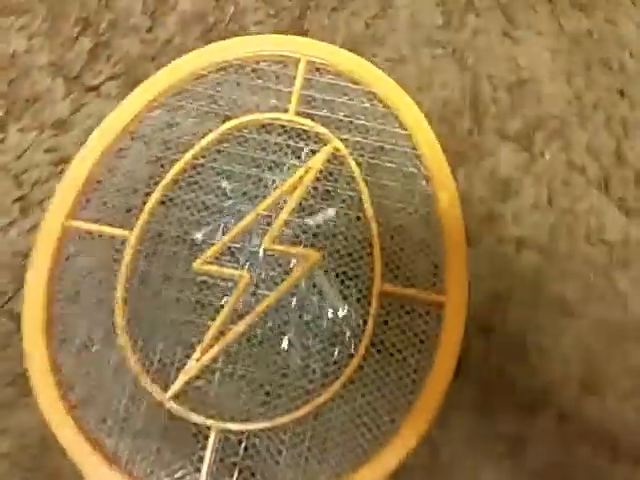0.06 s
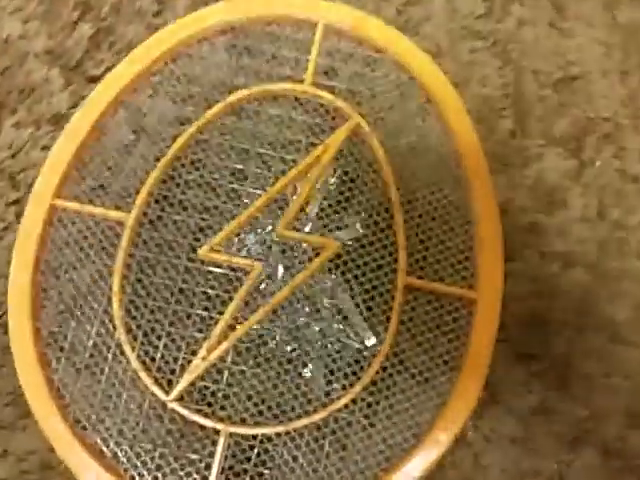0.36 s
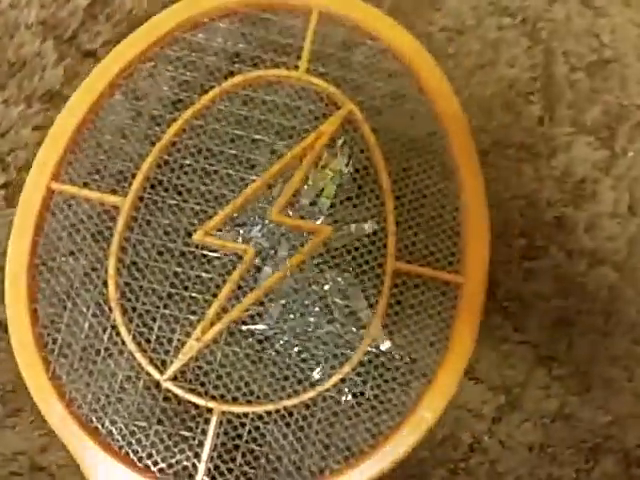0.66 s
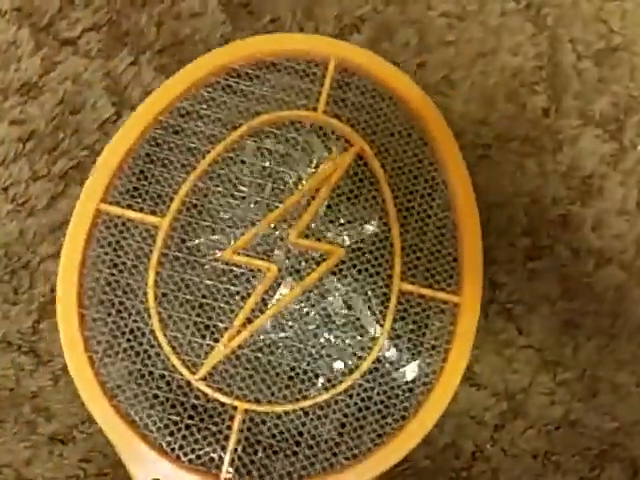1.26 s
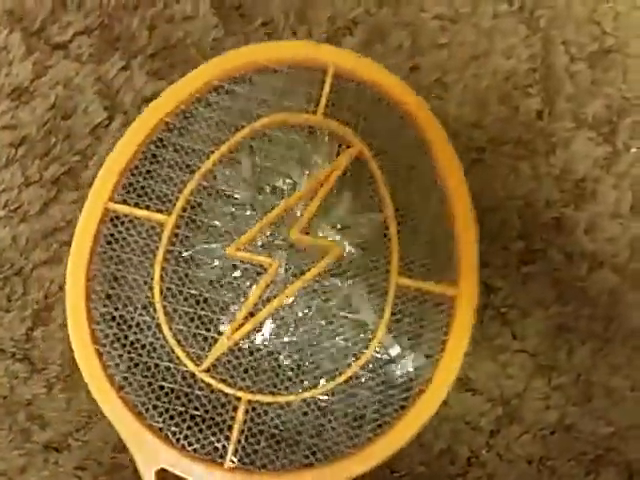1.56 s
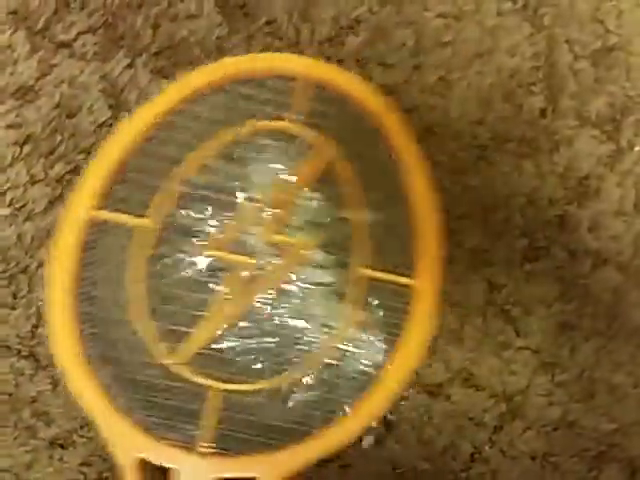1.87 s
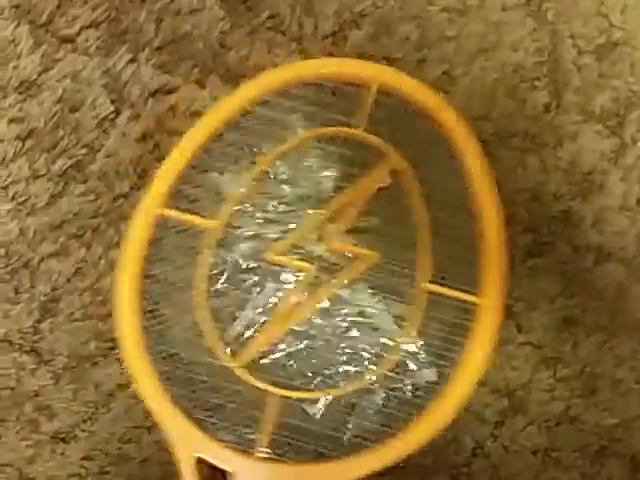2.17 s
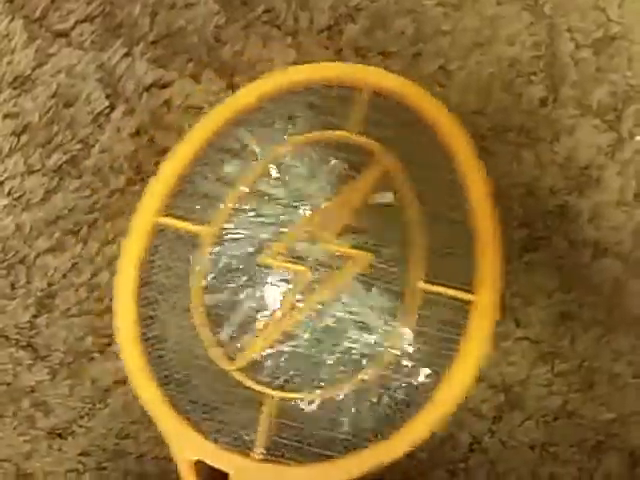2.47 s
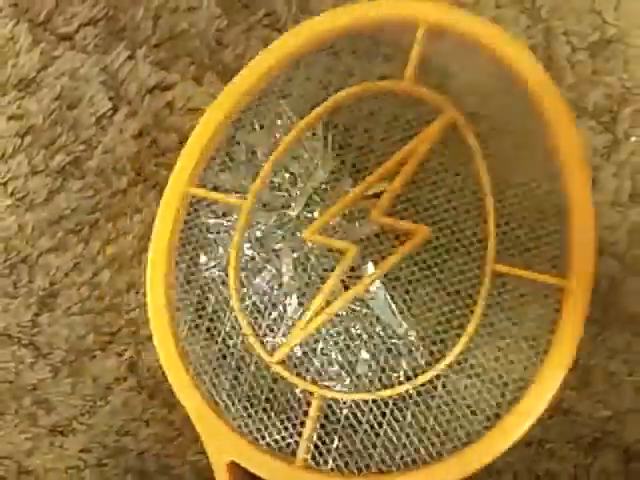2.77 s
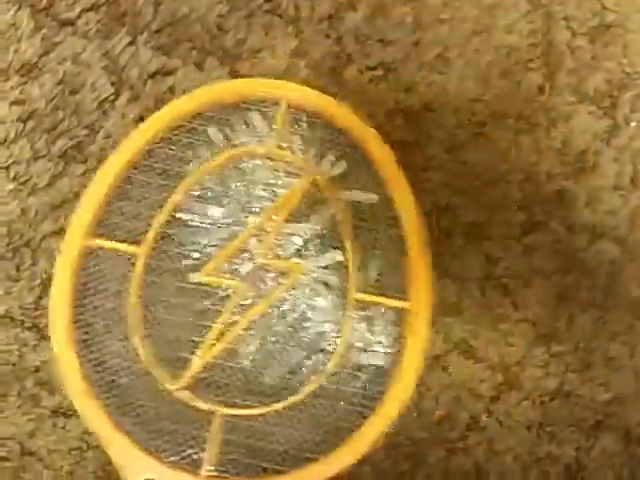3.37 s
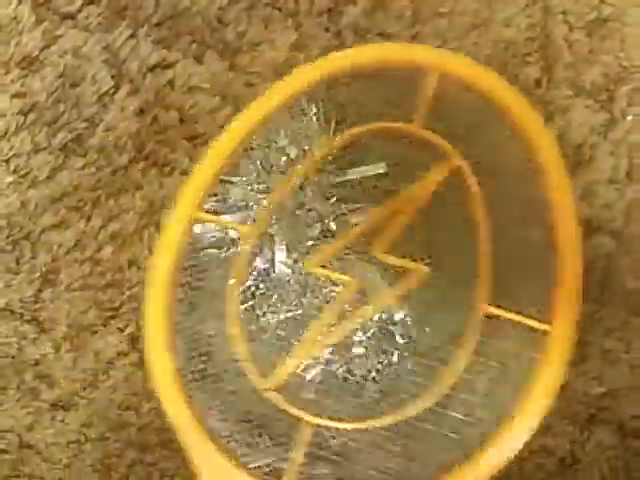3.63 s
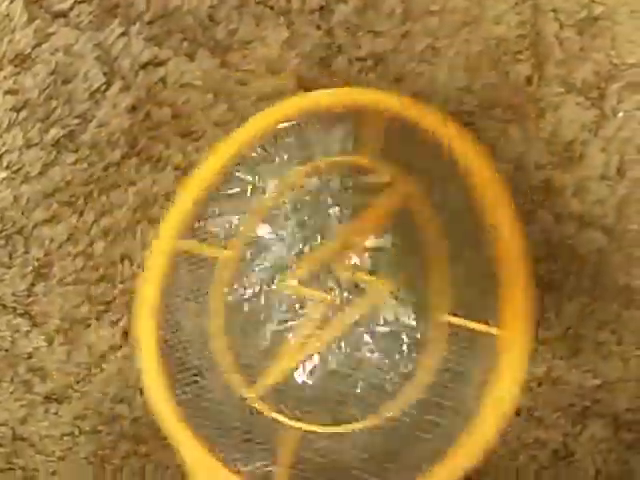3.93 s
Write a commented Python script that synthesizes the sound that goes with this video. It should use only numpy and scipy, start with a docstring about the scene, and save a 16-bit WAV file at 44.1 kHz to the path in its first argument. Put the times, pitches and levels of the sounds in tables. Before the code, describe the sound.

Crisp foil strands rustle and tick against an electric swatter's mesh before a spark cracks.

```python
"""Tinsel rustles in the mesh of an electric swatter racket, shaken close to the microphone in a small room.
Thousands of tiny touches between foil and wire make the rustle, and single strands flick out sharp ticks.
Underneath, the tuft rubs on the mesh, a loose part knocks in the handle, and the hands bump and rumble.
At the end the charged mesh sparks through the foil with one sharp snap."""
import sys
import numpy as np
from scipy import signal
from scipy.fft import rfft, irfft
from scipy.io import wavfile

SR = 44100
rng = np.random.default_rng(int(sys.argv[2]) if len(sys.argv) > 2 else 0)


def int16_out(signal):
    """Quantize to a 16-bit WAV file."""
    q = np.round(np.clip(np.atleast_2d(signal).T, -1, 1) * 32767)
    wavfile.write(sys.argv[1], SR, q.astype(np.int16))


N = 176400  # 4 seconds
TIME = np.arange(N) / SR
TICK_FADE_S = 0.0025  # every fade time here is the time to fall by 60 dB

def from_db(db):
    """Turn decibels into a number to multiply by."""
    return 10 ** (np.asarray(db) / 20)

def unit_power(x):
    """Scale a signal so that its average power is 1."""
    return x / np.sqrt(np.mean(x ** 2) + 1e-20)

def curve(rows):
    """Join (seconds, value) points with straight lines."""
    return np.interp(TIME, *np.transpose(rows))

def pan(db):
    """Left and right gains; positive dB leans left."""
    return from_db(np.array([[db], [-db]]) / 2)

def noise():
    """Separate white noise for left and right."""
    return rng.standard_normal((2, N))

def keep_band(x, hz, kind, order=2):
    """Keep the "low" or the "high" side of a frequency."""
    return signal.sosfilt(signal.butter(order, hz, kind, fs=SR, output="sos"), x + 1e-18)

def colour(x, table, size=8192):
    """Give each side the tone in a table; white noise keeps its overall power."""
    hz, *sides = np.transpose(table)
    log_hz = np.log(np.maximum(np.arange(size // 2 + 1) * SR / size, 1))
    gains = from_db([np.interp(log_hz, np.log(hz), db) for db in sides])
    # fold the filter so that it never sounds before its input
    cepstrum = irfft(np.log(gains))
    cepstrum[:, 1:size // 2] *= 2
    cepstrum[:, size // 2 + 1:] = 0
    response = unit_power(irfft(np.exp(rfft(cepstrum)))) / np.sqrt(size)
    return signal.fftconvolve(x, response, axes=1)[:, :N]

def drift(hz):
    """A smooth random wobble, about 1 in size."""
    return unit_power(keep_band(rng.standard_normal(N + SR), hz, "low")[SR:])

def decay(start, fade_s):
    """Jump to 1 at the start, then die away."""
    return (TIME >= start) * from_db(-60 * np.clip((TIME - start) / fade_s, 0, 4))

def click(start):
    """A single sample of height 1."""
    return 1. * (np.arange(N) == int(start * SR))

def ring(x, hz, fade_s):
    """Each click sets off a fading tone, like a struck object."""
    shrink = from_db(-60 / (fade_s * SR))
    turn = 2 * np.pi * hz / SR
    return signal.lfilter([0, np.sin(turn)], [1, -2 * shrink * np.cos(turn), shrink ** 2], x + 1e-18)

def room(x, echo_db=-6, fade_s=0.15):
    """Add the short, blurred echo of a carpeted room."""
    tail = unit_power(noise() * decay(0.0023, fade_s)) / np.sqrt(N)
    return x + from_db(echo_db) * signal.fftconvolve(x, tail[:, :SR // 2], axes=1)[:, :N]

# How alike left and right are. Each row: frequency in Hz, likeness (1 same, 0 unrelated, -1 opposite).
LIKENESS = [(30, 0.2), (60, 1), (110, 0.8), (200, 0.1), (300, 0.3), (400, 0.12), (500, -0), (800, 0.08),
            (1300, 0.08), (2000, -.1), (2900, -0.35), (4500, -0.29)]
def paired_noise():
    """White noise whose two sides agree at some frequencies and oppose at others."""
    hz, alike = np.transpose(LIKENESS)
    log_hz = np.log(np.arange(1, N // 2 + 2) * SR / N)
    alike = np.interp(log_hz, np.log(hz), alike)
    shared, opposed = irfft(rfft(noise()) * np.sqrt([1 + alike, 1 - alike]), N)
    return unit_power(np.array([shared + opposed, shared - opposed]))

# Tone of the grip's rumble. Each row: frequency in Hz, left dB, right dB.
RUMBLE_TONE = [(14.8, -4.5, -9), (29.8, -14.5, 2), (48, 4.5, 9.5), (74.4, 2.5, -2.5), (134, -5, 3),
               (200, -9.5, -10.5), (400, -18.5, -19.5), (664, -27.5, -29.5), (1500, -59.5, -58.5)]
# How the rumble swells. Each row: time in seconds, relative level in dB.
RUMBLE_LEVEL = [(0.0, -75.5), (0.12, -74), (0.42, -59.5), (0.73, -69), (0.89, -66.5), (1.47, -58),
                (2.17, -56), (2.41, -55.5), (2.93, -62.5), (3.11, -61), (3.56, -59.5), (3.9, -63)]
# Hand bumps. Each row: start in seconds, relative level in dB, pitch in Hz, treble cut in Hz, pan in dB.
BUMPS = [(0.33, -47, 119, 360, -18), (0.344, -49, 200, 380, -2), (.367, -51, 222, 400, 8),
         (0.455, -54.5, 150, 323, -16), (1.337, -44.5, 89.5, 385, -17), (1.836, -47.5, 111, 280, -16),
         (2.272, -32.5, 167, 620, -12.5), (2.282, -39.5, 100, 347, -8), (2.773, -51, 140, 327, -16),
         (3.118, -39, 128, 1900, 9), (3.155, -45.5, 200, 2000, 1)]
def hands():
    """The gripping hands make a low rumble and soft bumps."""
    sound = colour(paired_noise(), RUMBLE_TONE) * from_db(4.5 + curve(RUMBLE_LEVEL))
    for start, db, hz, cut_hz, side in BUMPS:
        thud = np.gradient(ring(click(start), hz, fade_s=0.018))
        thud = keep_band(thud, cut_hz, "low", order=4)
        sound += from_db(db - 2) * pan(side) * thud / np.abs(thud).max()
    return sound

# Knocks. Each row: start in seconds, strength in dB for the short notes, then for the long note.
KNOCKS = [(0.134, -65.5, -68.5), (0.204, -64, -68), (1.139, -55.5, -59), (1.468, -48, -49.5),
          (1.51, -49.5, -53.5), (1.904, -49.5, -52.5), (2.187, -37, -42.5), (2.208, -38, -44),
          (2.466, -42.5, -53), (3.081, -42.5, -44.5), (3.621, -33, -38.5)]
# The handle's notes, the long one first. Each row: pitch in Hz, gain in dB, fade in seconds, pan in dB.
HANDLE_NOTES = [(257, -10.5, 0.5, 18), (327, 6, 0.019, 6), (398, 1.5, 0.019, 12)]
def knocks():
    """A loose part strikes inside the handle: a dull knock that leaves a low ring."""
    sound = 0
    for k, (hz, note_db, fade_s, side) in enumerate(HANDLE_NOTES):
        blows = sum(from_db(long_db if k == 0 else short_db) * click(start)
                    for start, short_db, long_db in KNOCKS)
        note = ring(keep_band(blows, 600, "low"), hz, fade_s)
        sound += (-1) ** k * from_db(note_db + 2) * pan(side) * note  # the middle note is upside down
    return sound

# Tone of the rubbing. Each row: frequency in Hz, left dB, right dB.
RUB_TONE = [(200, 6.5, 5), (560, 7.5, 4), (950, -4, -2), (1420, 2.5, -1.5), (2240, 4, 1.5),
            (2940, -4.5, -6), (4240, -5, -6), (6900, -18.5, -17.5), (15000, -6.5, -9)]
# The rubbing, faint at first, then stronger. Each row: time in seconds, relative level in dB.
RUB_FAINT = [(.03, -107), (.2, -102), (.37, -92.5), (.65, -90), (.92, -93)]
RUB_STRONG = [(0.96, -87.5), (0.99, -83), (1.27, -84), (1.68, -74), (1.89, -78), (1.97, -68), (2.1, -71),
              (2.34, -67), (2.76, -64.5), (2.96, -79.5), (3.1, -73.5), (3.12, -61), (3.19, -72.5),
              (3.41, -67), (3.63, -66.5), (3.82, -74), (3.9, -73)]
def rubbing():
    """The tuft of tinsel slides softly over the mesh."""
    return colour(paired_noise(), RUB_TONE) * from_db(7.5 + curve([*RUB_FAINT, *RUB_STRONG]))

# Tones of the spark's crack and of its sizzle and echo. Each row: frequency in Hz, left dB, right dB.
CRACK_TONE = [(300, -8, 4), (790, 8.5, -7), (1380, -9, -10), (2000, 14.5, 2), (2390, 1, 6), (3200, -13, 0),
              (4560, -15, 7), (6400, -1, -7), (8900, 4, 0), (13500, 9, 7), (15300, 13.5, 12)]
SIZZLE_TONE = [(500, -28, -25), (2000, -21.5, -20), (4130, -12, -15.5), (6160, -18, -17.5),
               (7570, -4.5, -17), (8300, 4.5, -23), (12900, 8, 0), (14400, 10, 9), (16200, 5.5, -2)]
def spark(start=3.9208):
    """The charge jumps through the foil: a push of air, a crack, a sizzle and the room's echo."""
    push = keep_band(decay(start, fade_s=0.02), 1340, "low")
    push = keep_band(push, 70, "high", order=1)  # it rebounds in the microphone's opening
    crack = colour(np.sign(noise()) * from_db(-3.5) * decay(start, fade_s=0.014), CRACK_TONE)
    just_after = start + 0.0015
    sizzle = from_db(-10) * decay(just_after, fade_s=0.016)
    echo = from_db(-19.5) * decay(just_after, fade_s=0.24)
    return crack + colour(noise() * (sizzle + echo), SIZZLE_TONE) - from_db(-10) * pan(16.5) * push

# Flicks. Each row: start in seconds, tick strength in dB, tick pan in dB, mesh ring strength in dB.
FLICKS = [(.970, -52, -6, -72.5), (1.02, -50, 3, -69), (1.066, -47, 0, -75), (1.319, -52, 0, -76),
          (1.402, -38, 0, -70), (1.490, -32.5, 6, -68.5), (1.804, -42, -8, -88), (1.907, -32, 2, -71),
          (1.964, -32, -2, -70), (2.195, -41, 9, -54), (2.442, -27, 1, -75), (2.61, -25, -2, -68),
          (2.644, -25, -6, -57), (3.005, -35, 10, -57), (3.0267, -43, -4, -62), (3.062, -39, -4, -62),
          (3.104, -25, -16, -59), (3.504, -15.5, 13, -66), (3.5722, -9.5, -7, -48.5),
          (3.754, -24.5, -10, -66), (3.8474, -21, -6, -59)]
# Tones of a tick and of the ringing mesh. Each row: frequency in Hz, left dB, right dB.
TICK_TONE = [(2000, -24, -50), (6000, -23, -20), (9650, 1, -16), (13500, 8.5, -11), (14500, -2, 9),
             (14700, 2, 12.5)]
MESH_TONE = [(2500, -27, -23), (3500, -29, -19), (4100, 9, -4), (4900, 2, -0.5), (6270, -7, -17),
             (9000, 1, -29), (16000, -58, -22)]
def flicks():
    """A strand ticks on the mesh, which rings; the microphone adds a brief, very high ring of its own."""
    tick_level = jolts = mesh_level = 0
    for start, db, side, mesh_db in FLICKS:
        tick_level += from_db(db) * pan(side) * decay(start, TICK_FADE_S)
        jolts += from_db(db - 10.5) * click(start)
        mesh_level += from_db(mesh_db - 3.5) * decay(start, fade_s=0.15)
    ticks = np.sign(noise()) * tick_level
    microphone_ring = pan(-3) * ring(jolts, hz=15600, fade_s=0.005)
    mesh = noise() * mesh_level
    return colour(room(ticks), TICK_TONE) + microphone_ring + colour(mesh, MESH_TONE)

# How hard the foil moves: a gentle stir, then two shakes. Each row: time in seconds, relative level in dB.
GENTLE_STIR = [(0.9, -102), (0.94, -108), (0.968, -61), (1.06, -66.5), (1.066, -57.5), (1.106, -76),
               (1.444, -69.5), (1.5, -56.5), (1.59, -51), (1.606, -62), (1.666, -54.5), (1.77, -60),
               (1.796, -74), (1.804, -56.5), (1.854, -70), (1.9, -57)]
FIRST_SHAKE = [(1.9, -57), (1.962, -40.5), (2.034, -40), (2.062, -47), (2.2, -41), (2.278, -47),
               (2.384, -35), (2.422, -43.5), (2.542, -41), (2.566, -47), (2.612, -34), (2.69, -43.5),
               (2.756, -39.5), (2.844, -55.5), (2.87, -77), (2.98, -81)]
SECOND_SHAKE = [(2.98, -80), (3.03, -43.5), (3.046, -60.5), (3.106, -39.5), (3.16, -52), (3.372, -38),
                (3.562, -35.5), (3.574, -41), (3.582, -40.5), (3.63, -37), (3.74, -58.5), (3.754, -62.5),
                (3.836, -66), (3.846, -48.5), (3.91, -49)]
# Tone of the rustling foil. Each row: frequency in Hz, left dB, right dB.
TINSEL_TONE = [(940, -38.5, -45), (3430, -23, -23.5), (4380, -14.5, -24.5), (5730, -23, -24),
               (7070, -19.5, -25.5), (7530, -13.5, -29.5), (8720, -1.5, -24), (9860, -2.5, -22),
               (13060, -1, -13), (15230, -2, 6.5), (15140, -3, 6.5)]
def tinsel(touches_per_s=5000, crinkles_per_s=70):
    """Foil strands touch the wires; a harder shake makes the tiny touches louder and more frequent."""
    shake_db = curve([(0, -110), (0.89, -110), *GENTLE_STIR, *FIRST_SHAKE, *SECOND_SHAKE])
    rate = touches_per_s * from_db(shake_db + 42)  # equals touches_per_s at a shake of -42 dB
    chance = np.clip(rate / SR, 1e-4, 1)
    sizes = from_db(2.5 * np.minimum(rng.exponential(1, N), 4))
    touches = unit_power((rng.random(N) < chance) * sizes * noise() / np.sqrt(chance))
    # sharper crinkles stand out at random, each fading quickly
    kicks = (rng.random(N) < crinkles_per_s / SR) * rng.exponential(1, N) * from_db(7)
    shrink = from_db(-60 / (TICK_FADE_S * SR))
    crinkles = noise() * signal.lfilter([1], [1, -shrink], kicks + 1e-18)
    rustle = unit_power(touches + crinkles + noise())
    flutter_db = 2 * drift(hz=65)  # quick random swells
    rustle *= from_db(6 + shake_db + flutter_db)
    return colour(room(rustle), TINSEL_TONE)

def scene():
    """All the sounds together, over a faint hiss."""
    return tinsel() + flicks() + rubbing() + knocks() + hands() + spark() + from_db(-92) * noise()

def record(dry):
    """Flatten peaks that pass full scale, then cut the very highest treble."""
    treble_cut = signal.ellip(10, 0.2, 70, 15850, fs=SR, output="sos")
    return signal.sosfilt(treble_cut, np.clip(dry, -1, 1))

dry = scene()
out = record(dry)
int16_out(out)
```